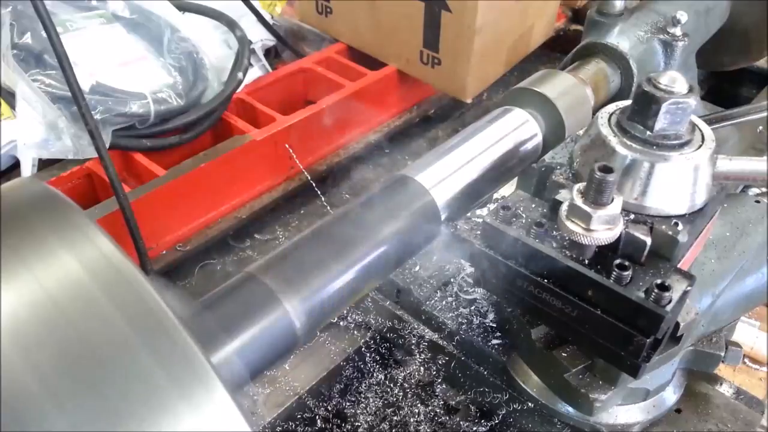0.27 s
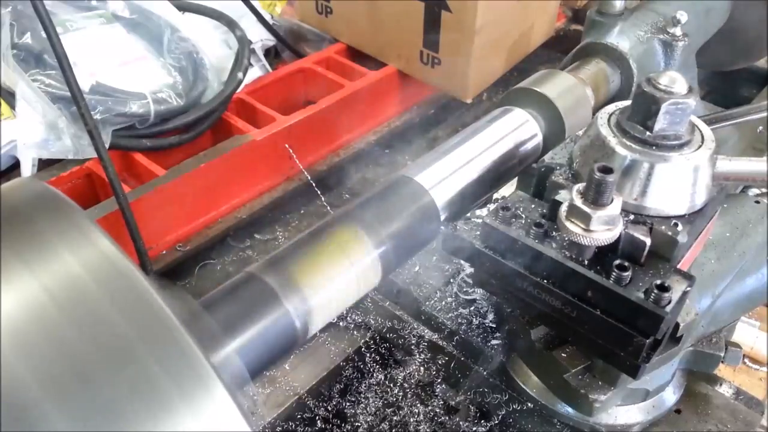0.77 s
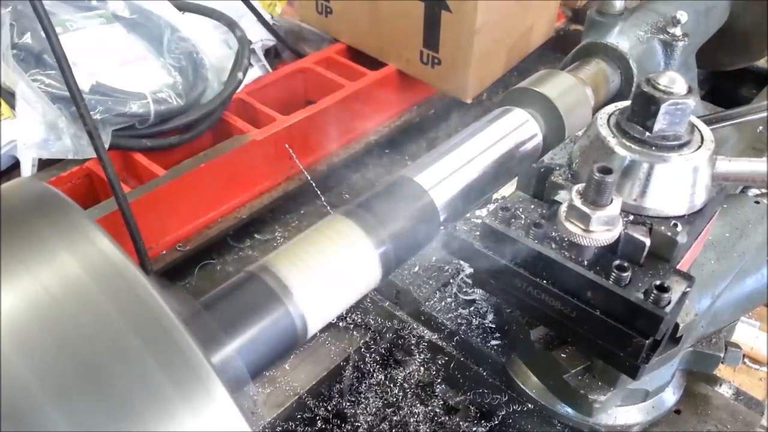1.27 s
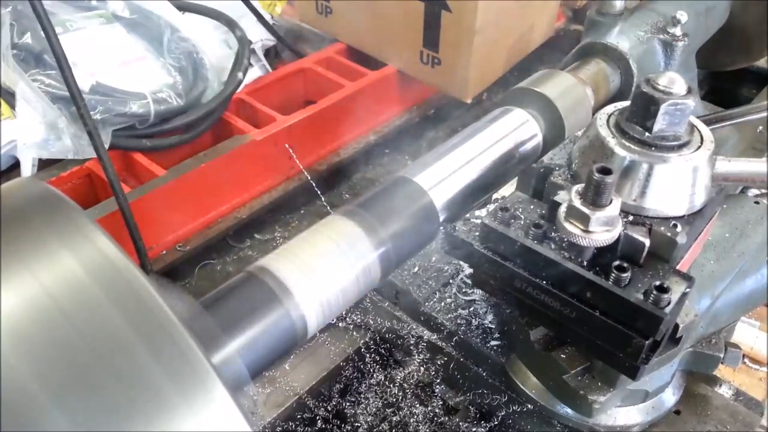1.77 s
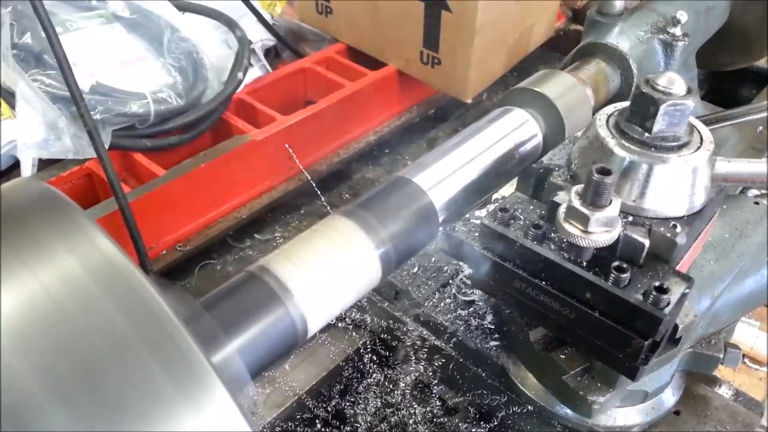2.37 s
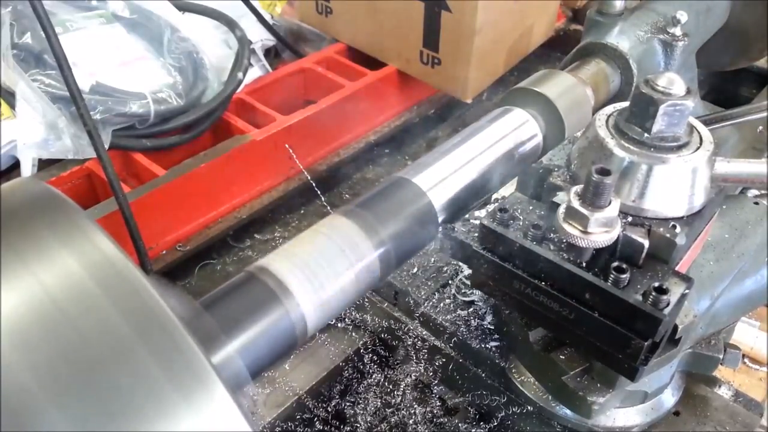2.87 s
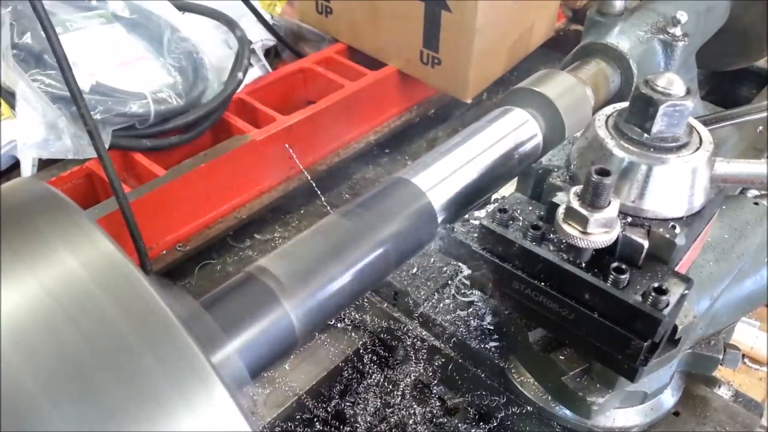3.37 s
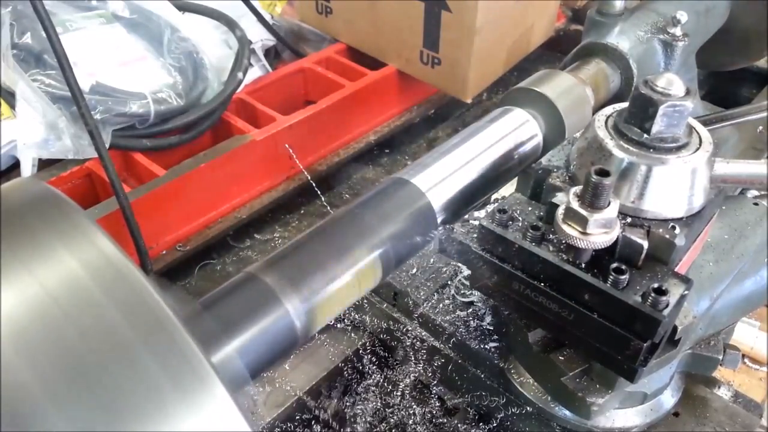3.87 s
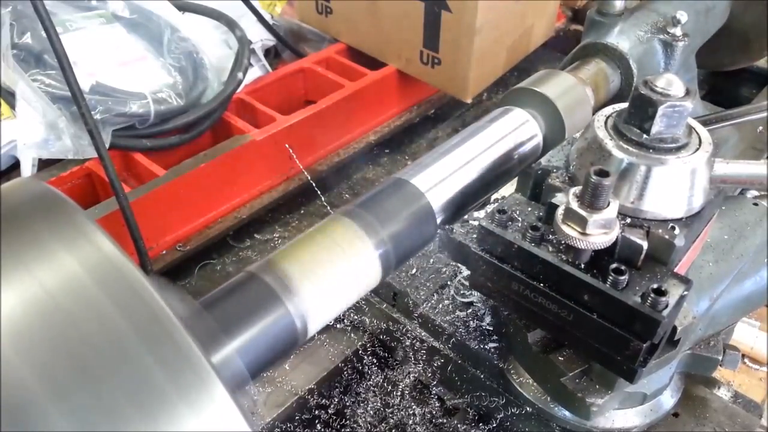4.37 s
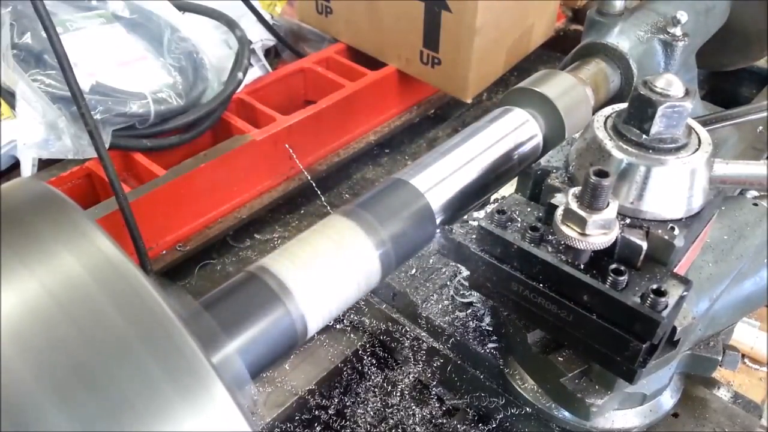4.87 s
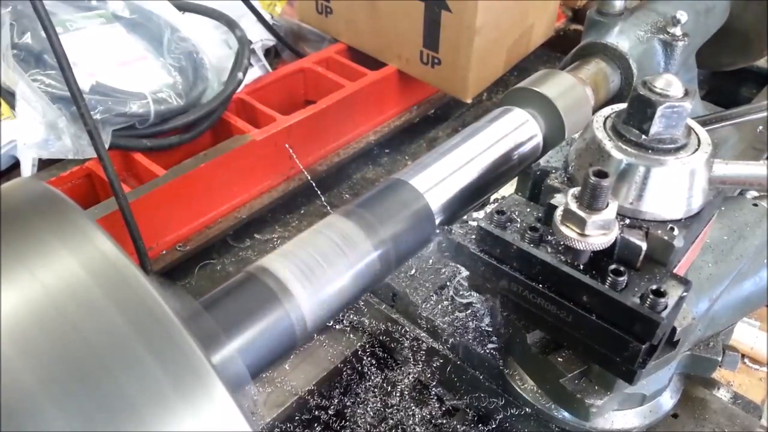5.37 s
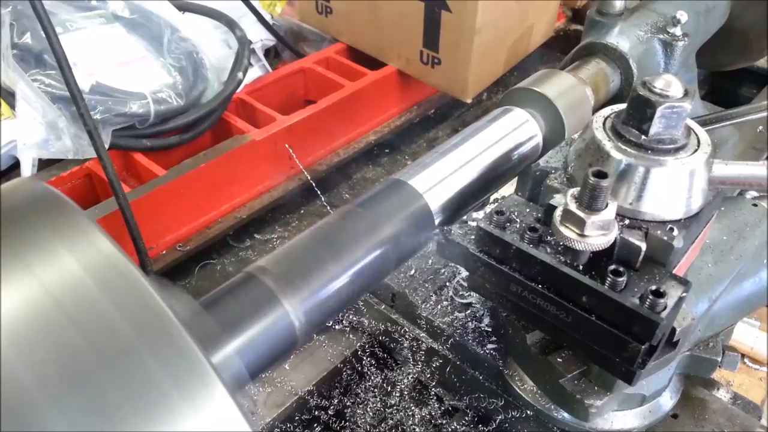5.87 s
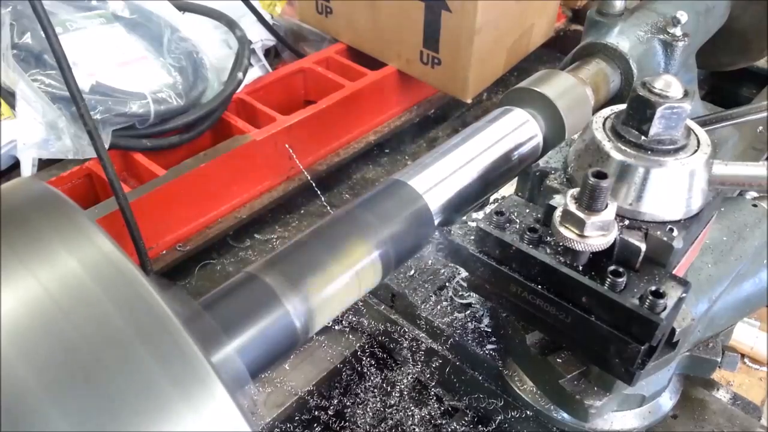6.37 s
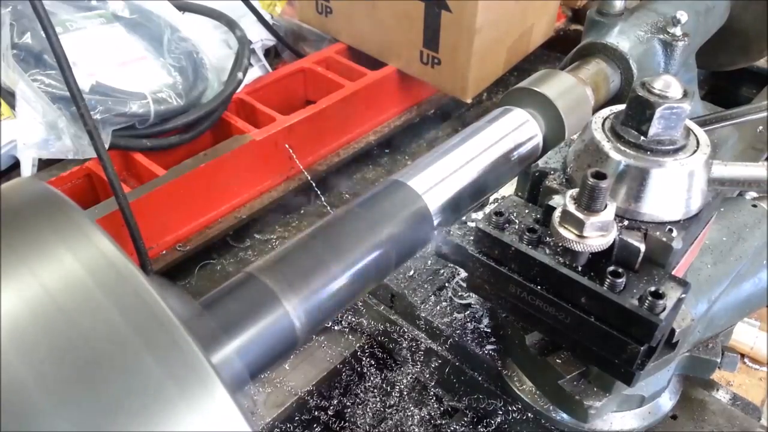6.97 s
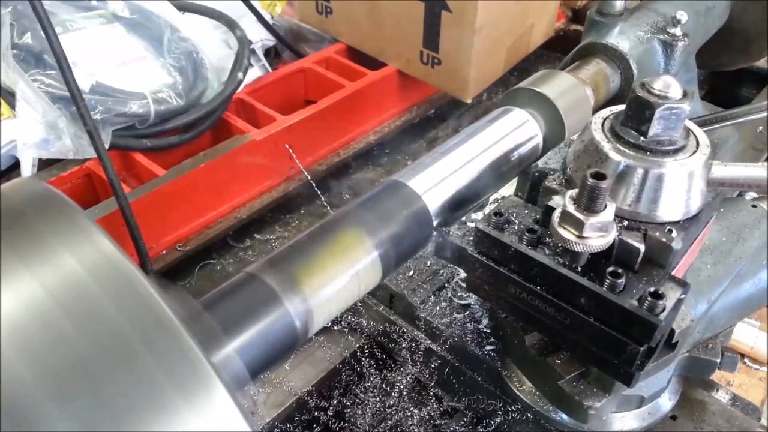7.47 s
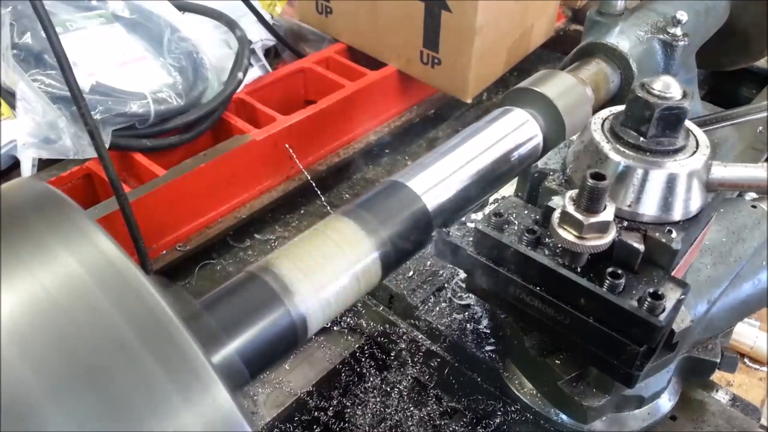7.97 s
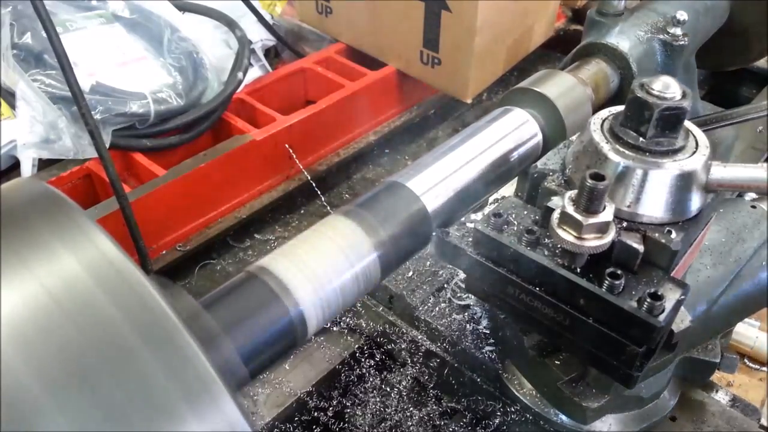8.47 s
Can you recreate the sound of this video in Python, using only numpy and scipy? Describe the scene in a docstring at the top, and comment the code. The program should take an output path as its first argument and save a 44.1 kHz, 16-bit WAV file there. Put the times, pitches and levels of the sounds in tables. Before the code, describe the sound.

A metal lathe cuts a steel shaft in a workshop, heard in stereo from about an arm's length. From the start, motor and gears hum steadily under a gritty rasp, with light rapid knocks and a sputtering metallic whine that flares irregularly. Small chips tick off the tool, mostly in the first three and a half seconds. A thin, very high squeal is faintly present, faltering around 2 seconds. From about 3.5 seconds it swells quickly, becoming loud and piercing by 5 seconds, and the machine noise dips and dulls a little beneath it. The squeal holds nearly one pitch with a fast, slight wobble and dominates from then on. At about 8.3 seconds a steel bar touches down softly twice on the left, then gives a light ringing clink. The lathe and squeal continue to the end, near 8.7 seconds.

```python
"""A squealing lathe

A lathe turns a steel shaft in a workshop, an arm's length from a phone with two microphones.
Motor and gears hum, and the cut rasps and knocks through the machine's cast metal body.
The tool starts to chatter (shake very fast): a thin squeal swells until the phone turns itself down.
A steel bar clinks near the end."""
import sys
import numpy as np
from scipy import signal
from scipy.fft import rfft, irfft, next_fast_len
from scipy.io import wavfile
from scipy.ndimage import uniform_filter1d

SR = 44100
rng = np.random.default_rng(int(sys.argv[2]) if len(sys.argv) > 2 else 0)


def generate_wav(signal):
    """Clip the signal to [-1, 1] and save it as 16-bit WAV at the path in sys.argv[1]."""
    frames = np.transpose(np.atleast_2d(signal))
    scaled = np.clip(frames, -1, 1) * 32767
    pcm = np.round(scaled).astype(np.int16)
    wavfile.write(sys.argv[1], SR, pcm)


N = 384987
TIME = np.arange(N) / SR
SPINDLE_HZ = 13.6085  # turns of the shaft each second
MACHINE_DB = -23  # base level for the machine noise, whine and squeal
LEFT_LAG_S, LEFT_LEAD_RAD = .00033, 0.35  # left microphone: longer path, slight phase mismatch


def undb(db):
    """Turn decibels into a number to multiply by."""
    return 10 ** (np.asarray(db) / 20)


def curve(table):
    """Join a time table's rows with straight lines: one curve for each value column."""
    times, *columns = np.transpose(table)
    return [np.interp(TIME, times, column) for column in columns]


def over_hz(table, hz):
    """Read a (frequency, value) table, giving every octave equal room."""
    table_hz, values = np.transpose(table)
    return np.interp(np.log(hz + 1), np.log(table_hz), values)


def wander(rate):
    """A smooth random curve of typical size 1 that changes about `rate` times a second."""
    hold = int(SR / rate)
    steps = np.repeat(rng.standard_normal(N // hold + 1), hold)
    smooth = uniform_filter1d(uniform_filter1d(steps, hold), hold)[:N]
    return smooth / smooth.std()


def sides_db(pan_db):
    """Split a left-minus-right level into a left row and a right row."""
    return np.vstack([pan_db, -pan_db]) / 2


# Low drone tones: (pitch [Hz], level [dB], throb rate [Hz], time of a throb's top [s],
# throb depth [0-1], fade start [s])
DRONE_TONES = [(104.8, -60.5, .92, 1.8, 0.1, 5.3), (133.7, -60, .67, 3.42, 0.6, 5.0),
               (160, -66, .75, 3.7, .4, 4.7), (211.6, -52.5, 1.19, 2.94, .9, 3.0)]


def drone(waver_db=1.2, fade_db_per_s=22):
    """Low tones throb, waver and die away; gives each one's pitch and level curve."""
    tones = []
    for hz, db, throb_hz, top_s, depth, fade_s in DRONE_TONES:
        throb = 1 + depth * np.cos(2 * np.pi * throb_hz * (TIME - top_s))
        fade_db = fade_db_per_s * np.maximum(TIME - fade_s, 0)
        tones.append((hz, db + 20 * np.log10(throb) + waver_db * wander(5) - fade_db))
    return tones


# Motor and gear tones: (pitch [Hz], level [dB])
MOTOR_TONES = [(240, -49), (246.45, -43.5), (360, -55), (366.4, -53), (492.9, -44), (499, -52), (626, -46),
               (666.9, -51), (707.6, -46.5), (435.5, -53), (639.6, -50), (612.6, -52), (721.3, -50),
               (868, -51)]


def hum(waver_db=0.5, pan_db=-1.5):
    """Motor and gears hum over the drone; the tones start in step, and close pairs pulse together."""
    arrival = TIME - np.array([[LEFT_LAG_S], [0]])
    lead = np.array([[LEFT_LEAD_RAD], [0]])
    tones = [(hz, db - waver_db * wander(2.9)) for hz, db in MOTOR_TONES] + drone()
    out = sum(undb(db) * np.cos(2 * np.pi * hz * arrival + lead) for hz, db in tones)
    return np.sqrt(2) * out * undb(sides_db(pan_db))


# Knocks of the drive on every turn: (place in the turn [0-1], strength [dB])
DRIVE_KNOCKS = [(.06, -11.5), (.17, -0.2), (.33, -13.5), (.435, -8), (0.56, -12), (0.71, -6.5), (0.84, -12),
                (.92, -5.5), (0.969, -6)]
# Metal chips snapping off against the tool: (time [s], strength [dB])
CHIP_SNAPS = [(0.1416, -19.5), (0.3047, -19), (0.8764, -14.5), (1.315, -12.5), (1.504, -20),
              (1.6277, -14.5), (1.925, -12), (1.9405, -11.5), (2.003, -7), (2.0578, -13.5), (2.1424, -21),
              (2.2164, -14), (2.2894, -17), (2.3461, -20), (2.584, -17.5), (3.024, -16), (3.2959, -19.5),
              (3.465, -19.5), (4.4223, -14.5), (7.0873, -8)]
# How deep the tool cuts, heard as the level of the rasp: (time [s], level [dB])
CUT_DEPTH = [(0, 1), (.7, -0.5), (1.4, -0.3), (2.1, 0.2), (2.8, -0.15), (3.5, 0), (4.2, 0.1), (5, 0.2),
             (5.6, -0.4), (6.1, -.5), (6.5, 0.7), (7, .8), (7.5, -0.1), (7.9, -.3), (8.1, -0.3), (8.3, 0.5),
             (8.73, 0.1)]


def cutting_force(knock_db=-18.5, scatter_db=6.5, snap_db=-4.5, fade_s=0.002, grit_db=1.5, swell_db=0.28):
    """How hard the cut shakes the lathe: gritty tearing of steel, plus knocks and snapping chips."""
    place, strength_db = np.transpose(DRIVE_KNOCKS)
    turns = np.arange(int(N / SR * SPINDLE_HZ) - 1)[:, None]
    knock_times = (turns + place) / SPINDLE_HZ
    uneven_db = scatter_db * (2 * rng.random(knock_times.shape) - 1)
    blows = np.zeros(N)
    blows[(knock_times * SR).astype(int)] = undb(strength_db + knock_db + uneven_db)
    for time_s, db in CHIP_SNAPS:
        blows[int(time_s * SR)] += undb(db + snap_db)
    rise = int(.0012 * SR)  # each blow takes a moment to build
    rounded = uniform_filter1d(blows, rise) * np.sqrt(rise)
    fading = signal.lfilter([1], [1, -np.exp(-1 / (fade_s * SR))], rounded)
    tearing = undb(curve(CUT_DEPTH)[0] + grit_db * wander(400) + swell_db * wander(6))
    return tearing * (1 + fading)


# Overall tone of the machine noise on the right: (frequency [Hz], level [dB])
NOISE_COLOUR = [(25, -48.5), (60, -31.5), (180, -19), (270, -6.5), (560, -11.5), (1000, -2.5),
                (1450, -10.5), (2100, -5), (2800, -8), (3600, -9), (4300, -10.5), (5000, -12.5),
                (5500, -17), (6000, -22.5), (6500, -19.5), (7600, -21.5), (9600, -23), (11500, -48.5)]
# Where the metal body and shaft ring: (pitch [Hz], width [Hz], level [dB], left minus right [dB])
BODY_RINGS = [(447.5, 51, -5, -0.5), (502.6, 49, -5, 2), (633, 78, -3, 2), (713, 70, -1, 0.5),
              (870, 25, -4.5, 1), (963, 59, 0.5, -3.5), (1164, 60, -1, -4), (1269, 74, -2.5, 0),
              (1486, 24, -9.5, -5.5), (1746, 194, 0.5, 1), (2232, 100, -2, 1), (2362, 150, -3, -4.5),
              (2594, 55, -10, 5.5), (2826, 52, -9, 6), (3060, 90, -3, -4.5), (3353, 157, -11.5, 8),
              (3790, 110, -5, -3), (3925, 96, -3.5, -4.5), (4060, 60, -14, 4), (4165, 61, -3.5, -2),
              (4277, 100, -3, -8), (4430, 95, -6, -8), (4730, 120, -14, 1), (5330, 130, -11, -10),
              (5810, 160, -14.5, -2.5), (6240, 160, -19, -2)]
# The left microphone is shaded from high sounds: (frequency [Hz], left minus right [dB])
LEFT_SHADE = [(60, 4.5), (250, -3), (620, -0.5), (1050, -3), (1450, 0), (1800, -7), (2200, -4.5),
              (2600, 1.5), (3000, -2), (3400, 0), (4100, -0.5), (5000, -2.5), (5600, -6), (6300, -7.5),
              (7000, -10.5), (10500, -5.5)]
# How much noise both microphones hear alike: (frequency [Hz], share [0-1])
SHARED_NOISE = [(60, 0.1), (250, 0.81), (400, 0.82), (560, 0.8), (750, 0.74), (950, 0.97), (1300, 0.58),
                (1800, 0.65), (2300, 0.6), (2700, 0.21), (3200, 0.11), (3700, 0.01), (4600, 0.27),
                (5200, 0.32), (11000, 0)]


def machine_noise(force, rasp_from_hz=553.0, surge_db=0.74):
    """Rumble and rasp ring the metal body; some comes straight from the right, the rest off the walls."""
    size = next_fast_len(N + SR // 2) // 2 * 2
    hz = np.arange(size // 2 + 1) * SR / size
    power = undb(over_hz(NOISE_COLOUR, hz)) ** 2
    for centre_hz, width_hz, db, pan_db in BODY_RINGS:
        distance = (hz - centre_hz) * 2 / width_hz
        power = power + undb([[db + pan_db], [db]]) ** 2 / (1 + distance ** 2) ** 2
    noise = rng.standard_normal((6, N))
    rasp = rfft(noise[:3] * force / np.sqrt(np.mean(force ** 2)), size)
    rumble = rfft(noise[3:] * undb(surge_db * wander(4.095)), size)
    rasp_share = 1 / (1 + (rasp_from_hz / (hz + 1)) ** 4)  # rasp up high, rumble down low
    direct, walls_left, walls_right = np.sqrt(rasp_share) * rasp + np.sqrt(1 - rasp_share) * rumble
    shared = over_hz(SHARED_NOISE, hz)
    delay = np.exp(1j * (LEFT_LEAD_RAD - 2 * np.pi * hz * LEFT_LAG_S))
    shade = undb(over_hz(LEFT_SHADE, hz))
    left = (np.sqrt(shared) * direct * delay + np.sqrt(1 - shared) * walls_left) * shade
    right = np.sqrt(shared) * direct + np.sqrt(1 - shared) * walls_right
    body = [ringing_filter(np.sqrt(side)) for side in power]
    out = irfft(np.array([left, right]) * body, size)[:, :N]
    return out * undb(MACHINE_DB) / np.sqrt(np.mean(out ** 2))


def ringing_filter(gain):
    """A filter with these gains that rings after a blow, never before it (minimum phase)."""
    cepstrum = irfft(np.log(gain))
    cepstrum[1:len(gain) - 1] *= 2
    cepstrum[len(gain):] = 0
    return np.exp(rfft(cepstrum))


# Brief swells of the whine: (time of the top [s], half length [s], boost [dB])
WHINE_FLARES = [(0.093, 0.013, 1), (0.308, 0.04, 9.5), (0.506, 0.029, 8), (0.821, 0.044, 7), (0.9, 0.04, 8),
                (0.95, 0.014, 3.7), (1.017, 0.026, 6.2), (1.191, 0.032, 4.2), (1.32, 0.031, 6.1),
                (1.464, 0.017, 4.8), (1.559, 0.032, 6), (1.632, 0.019, 3.7), (1.846, 0.017, 13),
                (1.923, 0.027, 8), (2.004, 0.027, 6), (2.219, 0.033, 8), (2.276, 0.022, 6),
                (2.585, 0.021, 6), (2.644, 0.033, 8), (3.104, 0.046, 5), (3.339, 0.056, 8),
                (3.469, 0.016, 2), (3.603, 0.04, 7), (3.689, 0.045, 6), (3.819, 0.026, 4.4),
                (3.886, 0.018, 5), (4.001, 0.036, 6), (4.495, 0.048, 8), (4.587, 0.04, 7),
                (4.944, 0.04, 3.5), (5.23, 0.017, 9), (5.605, 0.027, 2.5), (5.673, 0.024, 5.3),
                (5.731, 0.04, 1), (5.894, 0.017, 3), (5.977, 0.04, 5), (6.187, 0.04, 6), (6.274, 0.026, 7),
                (6.318, 0.039, 7), (6.415, 0.019, 7), (6.449, 0.017, 5), (6.554, 0.026, 3.8),
                (6.851, 0.025, 7), (6.907, 0.028, 8), (7.065, 0.017, 7), (7.09, 0.02, 9), (7.145, 0.034, 3),
                (7.364, 0.028, 6), (7.436, 0.027, 5), (7.51, 0.016, 8), (7.581, 0.04, 2), (7.73, 0.04, 3.6),
                (7.808, 0.029, 6), (8.173, 0.028, 5), (8.228, 0.044, 9), (8.394, 0.046, 5.7),
                (8.54, 0.034, 7), (8.592, 0.059, 4.5)]


def flares_db():
    """Extra level for the whine: each flare swells and sinks smoothly."""
    boost = np.zeros(N)
    for top_s, half_s, db in WHINE_FLARES:
        swell = db * np.hanning(int(2 * half_s * SR))
        start = int((top_s - half_s) * SR)
        span = slice(start, start + len(swell))
        boost[span] = np.maximum(boost[span], swell)
    return boost


# Ringing tones of the tool holder: (pitch [Hz], pitch wander [Hz], level [dB])
HOLDER_TONES = [(2268, 13.02, -4), (2224, 22, -10), (2320, 40, -11)]
# The whine between flares: (time [s], level above MACHINE_DB [dB])
WHINE_LEVEL = [(0, -9), (1.5, -9.5), (2.4, -10), (3.5, -9.5), (5, -9), (6.4, -9.5), (6.7, -12), (7.3, -9),
               (7.9, -9.5), (8.07, -13), (8.3, -8.5), (8.73, -11)]


def whine(force, stray_rad=0.61, left_lag_rad=1.5, pan_db=-3.0, sputter_db=2.0, throb_db=3.0):
    """The tool holder rings and sputters, kicked by the knocks and throbbing four times a turn."""
    tones = 0
    for hz, wander_hz, db in HOLDER_TONES:
        phase = 2 * np.pi * np.cumsum(hz + wander_hz * wander(60)) / SR
        shifts = np.array([stray_rad * wander(35) - left_lag_rad, stray_rad * wander(35)])  # left, right
        tones = tones + undb(db + sputter_db * wander(110)) * np.sin(phase + shifts)
    kicks = uniform_filter1d(force / force.mean(), int(0.0076 * SR)) ** 0.47  # ringing softens each kick
    throb = np.cos(2 * np.pi * (4 * SPINDLE_HZ * TIME + 0.22))
    level_db = MACHINE_DB + curve(WHINE_LEVEL)[0] + flares_db() + throb_db * throb
    return np.sqrt(2) * tones * kicks * undb(level_db + sides_db(pan_db))


# Taps of the steel bar: (time [s], strength [dB], rise time [s])
BAR_TAPS = [(8.28, -32, .004), (8.302, -25, .003), (8.389, -17.5, 0.0016)]
# The bar's ringing tones: (pitch [Hz], level [dB], time to fade by 60 dB [s])
BAR_TONES = [(1964, -2.5, 0.44), (5238, -24, 0.38)]


def bar_clinks(pan_db=13.0):
    """Off to the left a steel bar touches down lightly twice, then rings from a firmer knock."""
    out = 0
    for time_s, tap_db, rise_s in BAR_TAPS:
        age = np.maximum(TIME - time_s, 0)
        rise = 1 - np.exp(-age / rise_s)
        for hz, tone_db, ring_s in BAR_TONES:
            fade = undb(tap_db + tone_db - 60 * age / ring_s)
            out = out + rise * fade * np.sin(2 * np.pi * hz * age)
    return out * undb(sides_db(pan_db))


# Faint tones beside the squeal: (pitch offset [multiples of SPINDLE_HZ], level against the squeal [dB])
SIDE_TONES = [(-18, -44), (-16, -48), (-15, -47), (-13, -40), (-12, -42), (-11, -44), (-10, -39), (-9, -34),
              (-7, -45), (-6, -41), (-2, -28), (2, -29), (6, -42), (9, -33), (10, -46), (13, -39),
              (12, -43), (21, -47), (22, -44)]


def side_tones(phase, turn, blur_rad=0.25):
    """The turning shaft shakes the tool, adding faint tones just above and below the squeal."""
    return sum(undb(db) * np.sin(phase + offset * turn + 2 * np.pi * rng.random() + blur_rad * wander(32))
               for offset, db in SIDE_TONES)


# The squeal's wobble, four times a turn: (time [s], phase swing left [rad], phase swing right [rad],
# level swing left [0-1], level swing right [0-1], head start of the level swing [rad])
SQUEAL_WOBBLE = [(.8, .22, .22, 0.26, 0.15, -0.18), (3.7, .38, .51, 0.15, 0.32, 0.15),
                 (4.6, 0.42, 0.93, 0.18, 0.28, 0.49), (5.4, 0.33, 1, 0.02, 0.37, 1),
                 (6.4, 0.29, 0.93, 0.17, 0.1, 1.3), (7.4, 0.57, 0.61, 0.3, 0.15, 1.5),
                 (8.2, 0.48, 0.52, 0.02, 0.23, 1.4)]


def wobble(turn, off_centre_rad=(0.22, 0.2), off_centre_depth=0.067):
    """Pitch and level wobble four times a turn, and once a turn as the shaft runs off centre."""
    swing_left, swing_right, depth_left, depth_right, lead = curve(SQUEAL_WOBBLE)
    swing, depth = np.array([swing_left, swing_right]), np.array([depth_left, depth_right])
    fast = 4 * turn + 2 * np.pi * 0.23
    slow = turn - 2 * np.pi * 0.23
    lopsided = 0.12 * swing ** 2  # a deep wobble is not quite even
    bend = swing * np.cos(fast) + lopsided * np.sin(2 * fast) + np.outer(off_centre_rad, np.cos(slow))
    fast_throb = depth * np.cos(fast + lead) + lopsided * np.cos(2 * fast)
    slow_throb = off_centre_depth * (1 + 0.47 * wander(5.9)) * np.cos(slow)
    return bend, np.exp(fast_throb - slow_throb)


# How the chatter grows: (time [s], level above MACHINE_DB [dB], left minus right [dB])
SQUEAL_LEVEL = [(0, -26, -2.3), (0.07, -19, -2.3), (0.22, -15.5, -2.4), (0.8, -12.5, -2.1),
                (1.4, -16.5, -2), (1.62, -18.5, -2), (1.7, -29, -2), (1.75, -20, -2), (1.82, -25, -2),
                (1.9, -20, -2.3), (2.0, -19.5, -2.3), (2.045, -29, -2.2), (2.09, -22, -2.1),
                (2.16, -33, -2), (2.23, -19, -1.8), (2.42, -16, -1.5), (2.62, -17, -1.2), (3.0, -10.5, -.4),
                (3.45, -10, .8), (4.0, 3, 1.6), (4.45, 8.5, 2.5), (5.0, 14.5, 3.5), (5.6, 15.5, 2),
                (6.05, 15.5, -0.3), (6.5, 15.5, 2), (7.0, 14, 1), (7.36, 14, -1), (7.43, 12.5, 0),
                (7.48, 15, -2), (7.56, 15, -1), (7.66, 14.5, -2), (7.71, 15.5, -1), (7.77, 14.5, -.7),
                (7.85, 16.5, -.7), (7.94, 15, -2), (7.99, 17, 1), (8.14, 17, 0), (8.25, 15, 2),
                (8.32, 16, 1.5), (8.42, 15, -1), (8.465, 13.5, -.5), (8.495, 17.5, -2), (8.53, 15, -1.5),
                (8.73, 15.5, -4)]
# The squeal sinks slowly as the tool moves along the shaft: (time [s], pitch [Hz])
SQUEAL_GLIDE = [(0, 8664.5), (3, 8655.5), (4.5, 8650), (6, 8644), (8.73, 8635)]


def squeal(drift_rad=.1, left_lead_rad=0.34, sway_db=0.5, rough_db=0.24, grain_db=0.14):
    """The chattering tool rings at one high pitch that wobbles as the shaft turns."""
    over_db, pan_db = curve(SQUEAL_LEVEL)
    turn = 2 * np.pi * SPINDLE_HZ * TIME
    phase = 2 * np.pi * np.cumsum(curve(SQUEAL_GLIDE)[0]) / SR + drift_rad * wander(10)
    faint_tones = side_tones(phase, turn)
    bend, throb = wobble(turn)
    tone = throb * np.sin(phase + bend + np.array([[left_lead_rad], [0]]))
    pan_db = pan_db + sway_db * np.clip(over_db / 20, 0, 1) * wander(11)  # sways sideways when loud
    flutter_db = 0.8 + 0.8 * np.clip(-over_db / 20, 0, 1)  # flutters more when quiet
    shake_db = flutter_db * wander(16) + rough_db * wander(460) + grain_db * wander(1100)
    level_db = MACHINE_DB + over_db + shake_db + sides_db(pan_db)
    return np.sqrt(2) * undb(level_db) * (tone + faint_tones)


# The lowest and highest parts of the sound: (time [s], bass boost [dB], treble boost [dB])
BASS_AND_TREBLE = [(0, 1, 6), (1.5, -0.5, 4.5), (2.5, -1, 7), (3.1, -3, 0), (3.8, -1, 6), (4.0, -2, -9),
                   (5.2, 1, -11), (5.6, -2, -12.5), (6.3, 4, -14.5), (7.4, 2.5, -13), (8.1, -3.5, -13),
                   (8.73, -2, -12)]


def vary_bass_and_treble(mix, bass_hz=130, treble_hz=9800, swell_db=2.5, flicker_db=2.5):
    """The deepest bass swells and sinks; the highest treble flickers and thins out about halfway in."""
    bass_db, treble_db = curve(BASS_AND_TREBLE)
    size = next_fast_len(N)
    spectrum, hz = rfft(mix, size), np.fft.rfftfreq(size, 1 / SR)
    bass = irfft(spectrum / (1 + (hz / bass_hz) ** 4), size)[:, :N]
    treble = irfft(spectrum / (1 + (treble_hz / (hz + 1)) ** 60), size)[:, :N]
    bass_gain = undb(bass_db + swell_db * wander(6))
    treble_gain = undb(treble_db + flicker_db * wander(25))
    return mix + bass * (bass_gain - 1) + treble * (treble_gain - 1)


def scene():
    """All sounds at the two microphones; one cutting force drives both the rasp and the whine."""
    force = cutting_force()
    mix = machine_noise(force) + whine(force) + hum() + bar_clinks() + squeal()
    return vary_bass_and_treble(mix)


def record(dry, threshold_db=-18.5, ratio=2.025, follow_s=0.08, top_hz=11800):
    """The phone turns everything down when the sound gets loud, and cuts off the very highest treble."""
    memory = np.exp(-1 / (follow_s * SR))
    power = np.mean(dry ** 2, axis=0)
    heard_db = 10 * np.log10(signal.lfilter([1 - memory], [1, -memory], power) + 1e-9)
    cut_db = np.maximum(heard_db - threshold_db, 0) * (1 - 1 / ratio)
    low_pass = signal.ellip(8, .2, 70, top_hz, fs=SR, output="sos")
    return signal.sosfilt(low_pass, dry * undb(-cut_db))


dry = scene()
out = record(dry)
generate_wav(out)
```